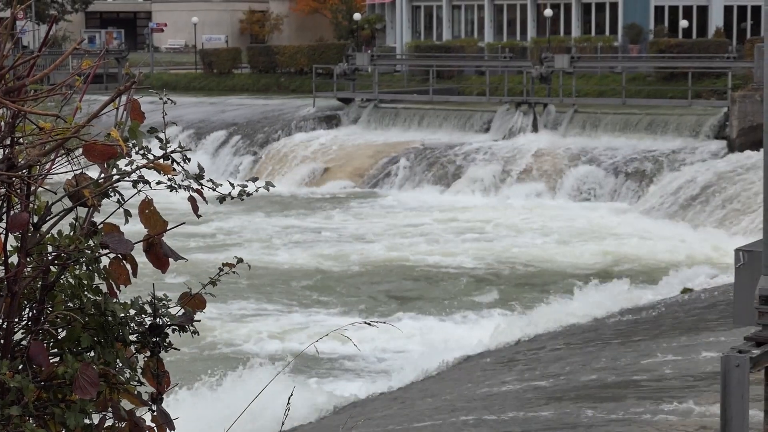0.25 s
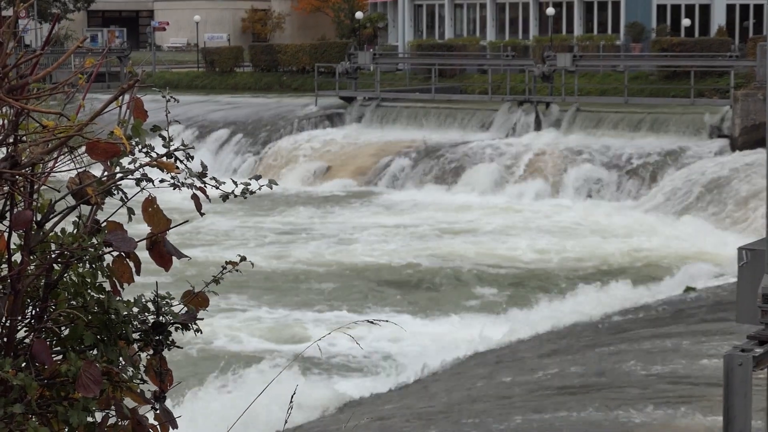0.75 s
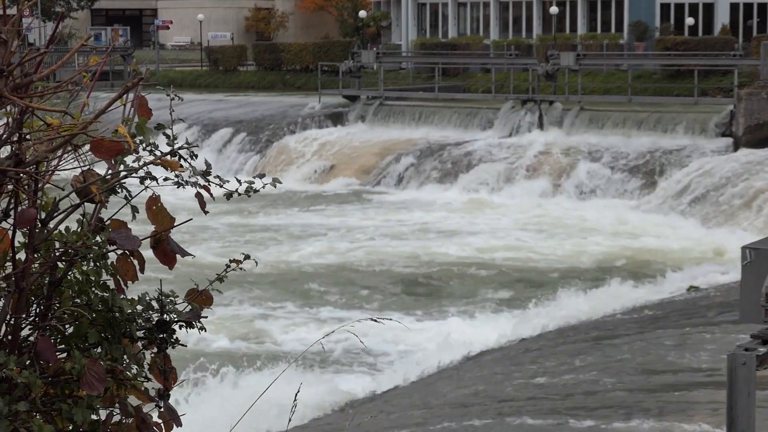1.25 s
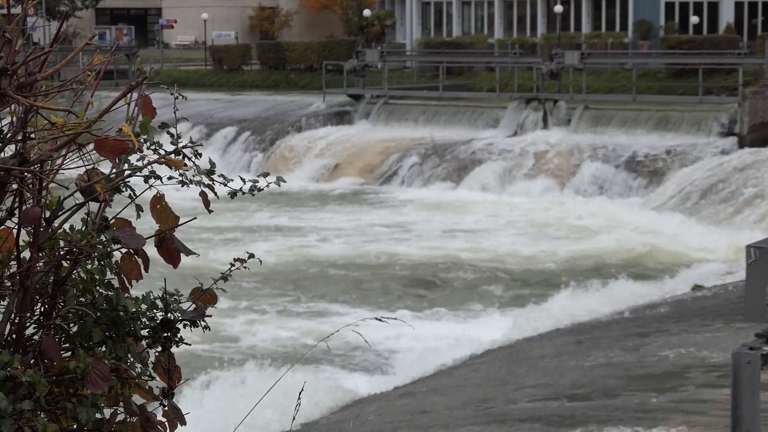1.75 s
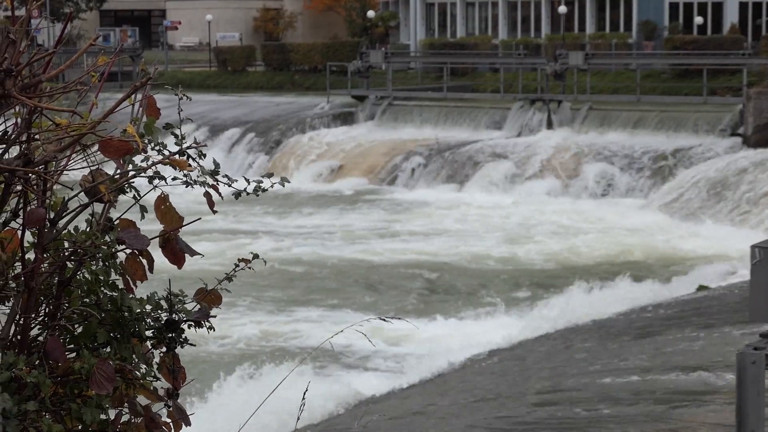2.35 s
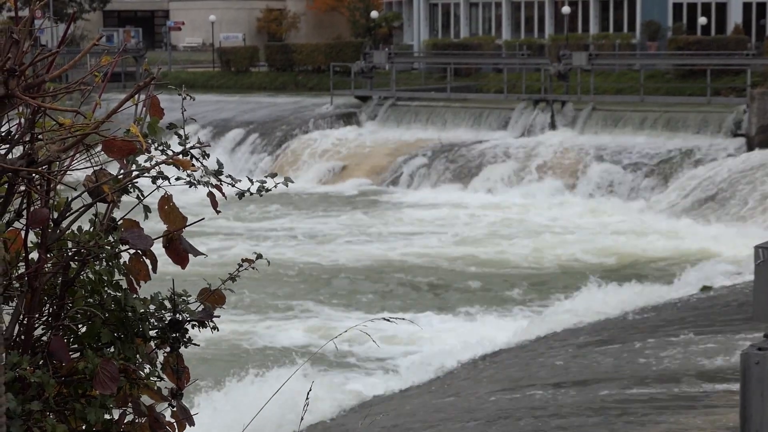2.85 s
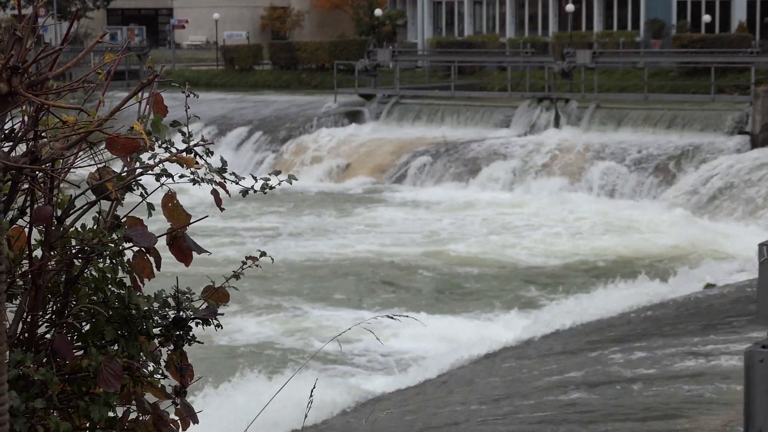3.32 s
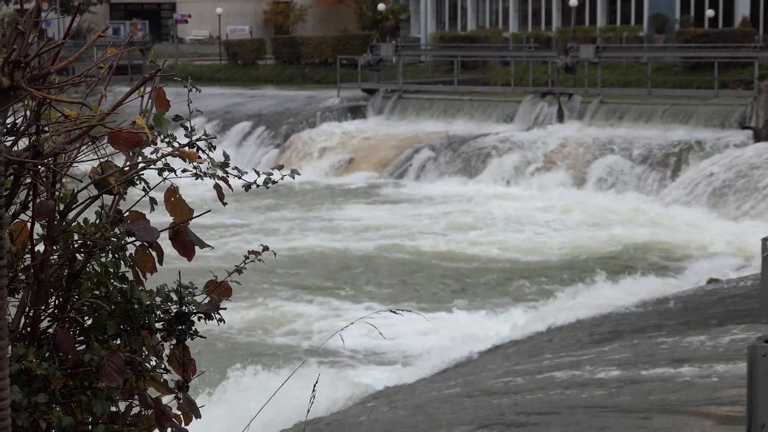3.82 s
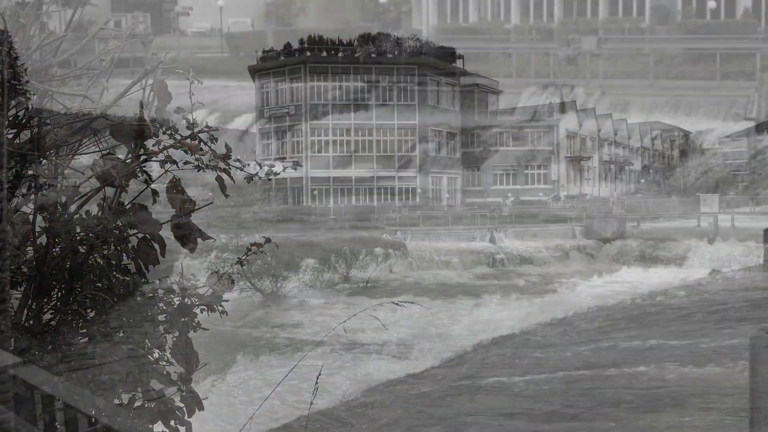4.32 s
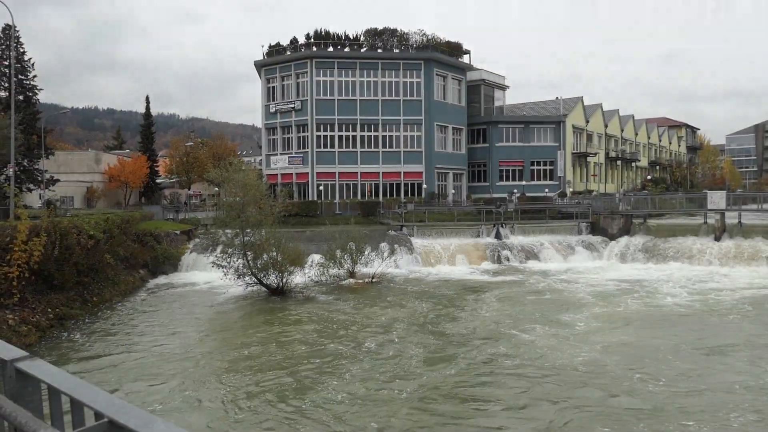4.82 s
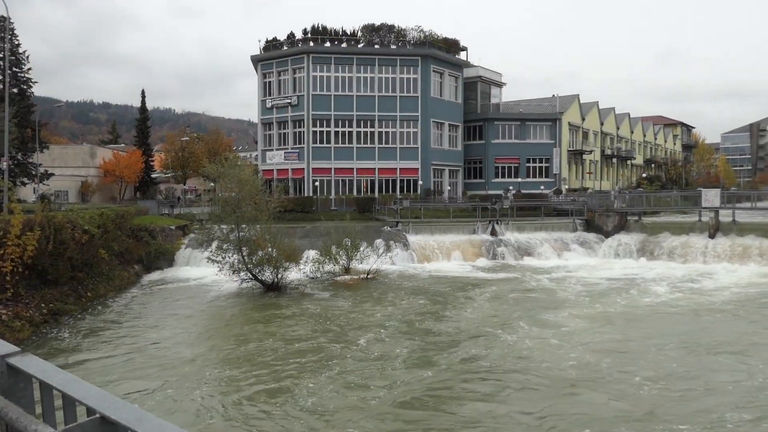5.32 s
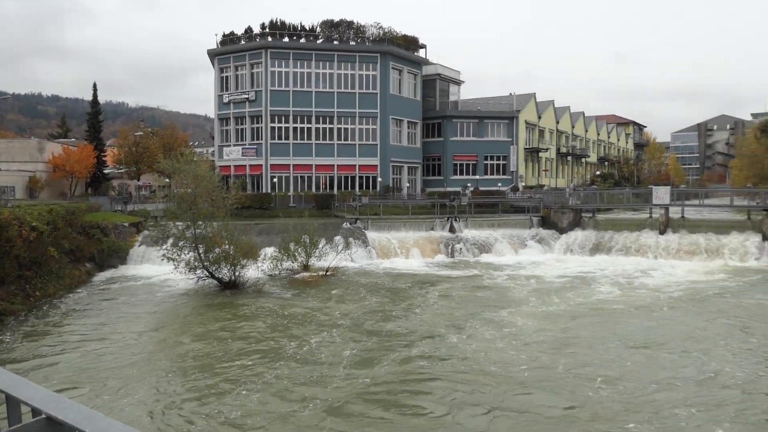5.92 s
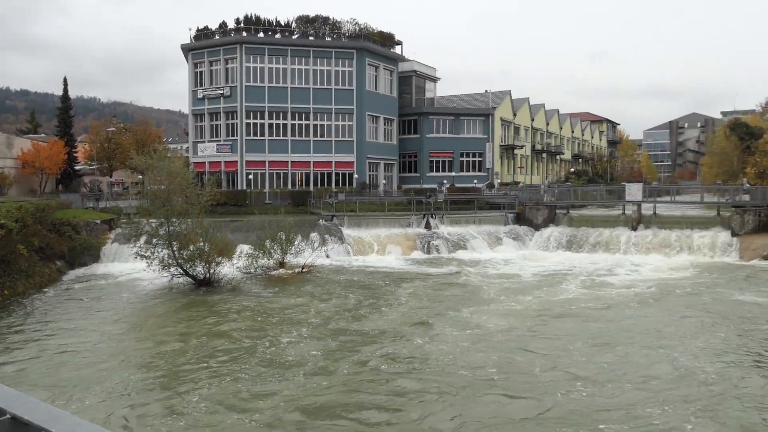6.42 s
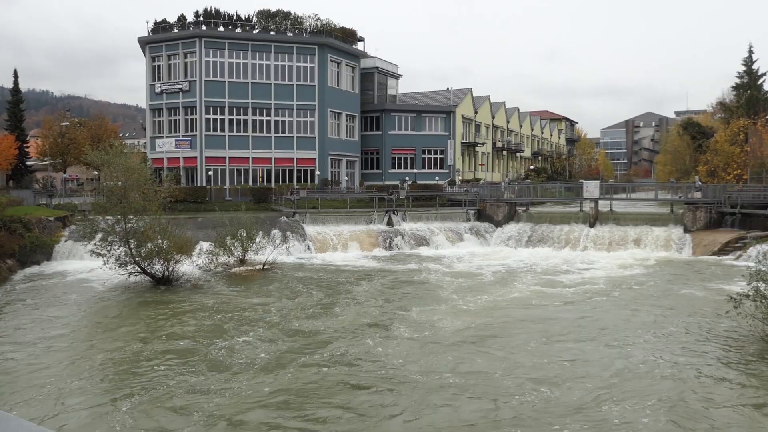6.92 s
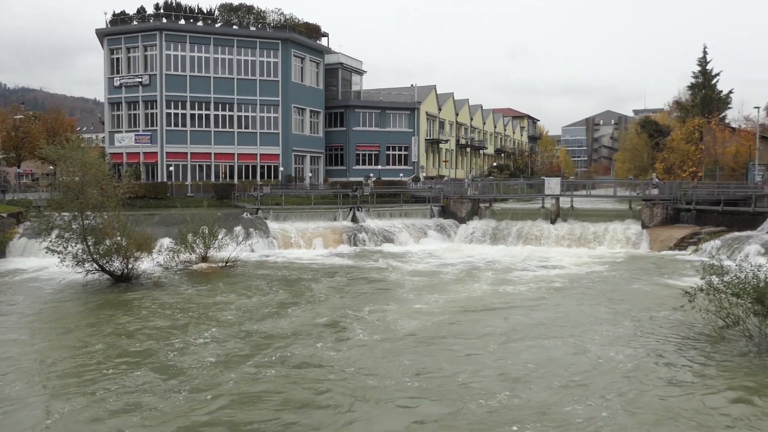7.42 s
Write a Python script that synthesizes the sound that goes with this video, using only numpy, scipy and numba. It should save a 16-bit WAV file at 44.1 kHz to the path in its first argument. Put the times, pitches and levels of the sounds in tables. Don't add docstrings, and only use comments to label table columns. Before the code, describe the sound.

From 0 to about 4.35 seconds, a swollen river churns loudly over a low weir, heard from the bank: a dense, continuous roar strongest in the low mids, with countless bubbles bursting in irregular patches and a softer, dull-topped spray. The level swells by only a decibel or so, and the image drifts slowly left. At about 4.2 seconds a very faint, thin bird whistle rises and levels off in under a tenth of a second; near 4.3 a tiny bright water tick lands close by. At 4.35 the sound cuts sharply to total silence. At about 4.64 it returns just as abruptly, the same weir from a bridge, similarly loud, with slightly more midrange wash and a different stereo spread. It surges gently, near 5.25 especially, the spray dulling slightly while drifting left, and continues until about 7.6 seconds. Compact stereo camera microphones, open air.

```python
import sys
import numpy as np
from scipy import signal
from scipy.fft import rfft, irfft, next_fast_len
from scipy.io import wavfile
from scipy.ndimage import map_coordinates
from numba import njit

SR = 44100
rng = np.random.default_rng(int(sys.argv[2]) if len(sys.argv) > 2 else 0)


def inscribe(sig):
    pcm = np.round(np.clip(np.atleast_2d(sig).T, -1, 1) * 32767)
    wavfile.write(sys.argv[1], SR, pcm.astype(np.int16))


def to_linear_factor(level_db):
    exponent = np.asarray(level_db, float) / 20
    return 10 ** exponent


N = 338247
TIME = np.arange(N) / SR
SIZE = next_fast_len(N)
HZ = np.maximum(np.arange(SIZE // 2 + 1) * SR / SIZE, 1)
BANK_END_S, BRIDGE_START_S, BRIDGE_END_S = 4.3508, 4.6441, 7.67


@njit
def ring_bubbles(start, hz, size, cycles, glide, count):
    out = np.zeros(count)
    for k in range(len(hz)):
        life = int(cycles * SR / hz[k])
        wave = size[k] + 0j
        turn = np.exp((2j * np.pi * hz[k] / SR) - 5 / life)
        climb = np.exp(2j * np.pi * hz[k] / SR * glide / life)
        for i in range(start[k], min(start[k] + life, count)):
            out[i] += wave.imag
            wave = wave * turn
            turn = turn * climb
    return out


def patches(s, octave, rate, per_octave):
    field = rng.standard_normal((100, 400))
    return map_coordinates(field, [octave * per_octave, s * rate], order=1, mode="wrap")


def unit(x):
    return x / np.sqrt(np.mean(x ** 2))


def whitewater(bubbles=260000, scatter_db=2.0, boil_db=0.9, flicker_db=2.0, roar_db=1.0):
    when, pitch, luck = rng.random((bubbles, 3)).T
    s = when * N / SR
    hz = 40 + 15500 * pitch
    octave = np.log2(hz / 40)
    burst_db = -scatter_db * np.log(1 - .995 * luck)
    boil = boil_db * patches(s, octave, 4.5, .6)
    flicker = flicker_db * patches(s, octave, 17, 2.484)
    size = np.sqrt(hz) * to_linear_factor(burst_db + boil + flicker)
    fizz = ring_bubbles((s * SR).astype(np.int64), hz, size, 10.0, .2, N)
    roar = to_linear_factor(roar_db) * rng.standard_normal(N)
    return rfft(unit(fizz) + roar, SIZE)


def over_hz(table):
    hz, *columns = np.transpose(table)
    return [np.interp(np.log(HZ), np.log(hz), c) for c in columns]


# time in seconds, level in dB.
FLOW_SURGE = [
    [(0, -0.7), (.55, -0.8), (1.1, 0.2), (1.6, -0.3), (2.2, -1.3), (2.75, -0.1), (3.3, -1.1), (3.8, .5),
     (4.35, -1)],
    [(4.64, 0.9), (4.95, -0.2), (5.25, 1.5), (5.65, -0.5), (6, 0.2), (6.3, .3), (6.65, .4), (7.1, -1.1),
     (7.67, 0.5)],
]


def viewpoint(near, wide, view, tone, ports, drift_db_per_s, spray_db_per_s, start_s, end_s):
    like, pan_db, lead = over_hz(ports)
    like = np.clip(like, 0, 1)
    left, right = to_linear_factor(pan_db / 2), to_linear_factor(-pan_db / 2)
    other_port = like * np.exp(-1j * lead) * near + np.sqrt(1 - like ** 2) * wide
    pair = np.array([left * near, right * other_port])
    pair = pair * to_linear_factor(over_hz(tone)[0]) / np.sqrt((left ** 2 + right ** 2) / 2)

    s, db = np.transpose(FLOW_SURGE[view])
    surge_db = np.interp(TIME, s, db - db.mean())
    turn_s = np.clip(TIME, start_s, end_s) - (start_s + end_s) / 2
    shares = over_hz(np.c_[(250, 1300, 6000), np.eye(3)])
    follow_db_per_db = (0.73, 0.63, 0.49)
    rumble, rush, spray = (irfft(pair * share, SIZE)[:, :N] * to_linear_factor(follow * surge_db)
                           for share, follow in zip(shares, follow_db_per_db))
    out = rumble + rush + spray * to_linear_factor(spray_db_per_s * turn_s)
    out = out * to_linear_factor(-19.5) / np.sqrt(np.mean(out.mean(axis=0) ** 2))
    out = out * to_linear_factor(drift_db_per_s * turn_s * np.array([[.5], [-.5]]))
    return out * ((TIME >= start_s - .1) & (TIME < end_s + .1))


# pitch in Hz, level in dB per Hz.
BANK_COLOUR = [(35, -38.5), (100, -10), (255, -0.5), (340, -3), (470, -9), (750, -9.5), (1400, -15),
               (2500, -17), (3600, -22), (5700, -35), (8100, -40.5), (10000, -37), (13000, -40),
               (15700, -45.5)]
# pitch in Hz, likeness 0-1, left minus right in dB, left lead in radians.
BANK_STEREO = [(30, 0.7, -10.5, 0.17), (120, 0.98, -2.5, 0), (395, .97, -1.9, 0.12),
               (900, 0.86, -2.5, 0.25), (1450, 0.79, -2, 0.54), (1780, 0.75, -.7, 0), (2500, 0.88, 0, 0.12),
               (3700, 0.91, 0, 0.43), (4500, 0.76, -0.5, 0.12), (5300, 0.2, -1, .6), (6200, 0, 2, 2.6),
               (9000, 0.2, 1, 0.75), (15000, 0.2, -3, 0.62)]


def bank_water(near, wide):
    return viewpoint(near, wide, 0, BANK_COLOUR, BANK_STEREO, drift_db_per_s=.27, spray_db_per_s=-.03,
                     start_s=0, end_s=BANK_END_S)


# pitch in Hz, level in dB per Hz.
BRIDGE_COLOUR = [(35, -34), (180, -3), (295, 0), (740, -10), (1400, -8), (1750, -10), (2120, -16),
                 (2750, -14), (4900, -26), (5800, -33), (8000, -38), (10200, -36.5), (13000, -41.5),
                 (15700, -48)]
# pitch in Hz, likeness 0-1, left minus right in dB, left lead in radians.
BRIDGE_STEREO = [(30, .5, -3, 0), (120, .98, -3, 0), (350, .97, -2, 0), (650, .92, -5, -.15),
                 (950, .88, -3.6, -.25), (1380, .78, -8.5, -1.8), (1750, .82, -.5, -1.85),
                 (2080, .6, 5.2, -.4), (2450, .88, 2.8, -.05), (3300, .85, .3, .1), (4300, .76, 1, .1),
                 (5250, .15, 0, 0), (6700, .45, .5, 3), (12000, .35, -1, 0)]


def bridge_water(near, wide):
    return viewpoint(near, wide, 1, BRIDGE_COLOUR, BRIDGE_STEREO, drift_db_per_s=.35, spray_db_per_s=-.1,
                     start_s=BRIDGE_START_S, end_s=BRIDGE_END_S)


def bird(start_s=4.215, length_s=.08, level_db=-48.5, low_hz=5550, high_hz=6530, climb_s=.018, edge_s=.009):
    s = np.clip(TIME - start_s, 0, length_s)
    hz = high_hz - (high_hz - low_hz) * np.exp(-s / climb_s)
    swell = np.clip(np.minimum(s, length_s - s) / edge_s, 0, 1)
    return np.sqrt(2) * to_linear_factor(level_db) * swell * np.sin(2 * np.pi * np.cumsum(hz) / SR)


# time in seconds, peak in dB.
STRAY_DROPS = [
    (4.297, -25),
]


def drops():
    out = np.zeros(N)
    for s, db in STRAY_DROPS:
        out += to_linear_factor(db) * np.exp(-np.abs(TIME - s) / 0.0013) * rng.standard_normal(N)
    return signal.sosfilt(signal.butter(2, (4000, 10000), "band", fs=SR, output="sos"), out)


# start in seconds, lowest joined pitch in Hz,
# share of patches upside down at 7 kHz, the same share at 13 kHz.
JOINED_TREBLE = [
    (0, 6200, .09, .02),
    (2.2, 6200, .15, .14),
    (4.5, 17000, 0, 0),
    (4.9, 8500, .2, .12),
    (5, 6200, .25, .055),
]


def share_treble(x, step_db=2.0, wander_db=1.5, top_lost=.45, coarse=1.7):
    frame, frame_start, top_line = 1024, 620, 704
    band_edges = np.r_[292, 320:769:32]
    n, k = np.arange(2 * frame)[:, None] + .5, np.arange(frame) + .5
    window = np.sin(np.pi * n / frame / 2)
    basis = window * np.cos(np.pi / frame * (n + frame / 2) * k) * np.sqrt(2 / frame)
    lead = 2 * frame - frame_start
    blocks = np.pad(x, ((0, 0), (lead, 2 * frame - (N + lead) % frame))).reshape(2, -1, frame)
    left, right = np.concatenate([blocks[:, :-1], blocks[:, 1:]], axis=2) @ basis
    count = len(left)

    s, *columns = np.transpose(JOINED_TREBLE)
    frame_s = ((np.arange(count) + 1) * frame - lead) / SR
    stretch = np.maximum(np.searchsorted(s, frame_s) - 1, 0)
    from_hz, low, high = (c[stretch] for c in columns)
    for a, b in zip(band_edges[:-1], band_edges[1:]):
        hz = a * SR / frame / 2
        chance = low + (high - low) * np.clip((hz - 7000) / 6000, 0, 1)
        luck = rng.random(count)
        luck = np.where(rng.random(count) < .08, np.roll(luck, 1), luck)
        sign = np.where(luck < chance, -1, 1)[:, None]
        both = left[:, a:b] + sign * right[:, a:b]
        left_power, right_power, both_power = (np.sum(v ** 2, axis=1, keepdims=True) + 1e-18
                                               for v in (left[:, a:b], right[:, a:b], both))
        pan_db = 10 * np.log10(right_power / left_power) + wander_db * rng.standard_normal(sign.shape)
        pan_db = step_db * np.round(pan_db / step_db)
        step = coarse * (hz / 10000) ** 0.37 * np.sqrt(both_power / (b - a))
        both = np.round(both / step)
        both = both * np.sqrt(left_power / (np.sum(both ** 2, axis=1, keepdims=True) + 1))
        on = hz >= from_hz
        left[on, a:b] = both[on]
        right[on, a:b] = (sign * to_linear_factor(pan_db) * both)[on]
    lost = rng.random(count) < top_lost
    left[lost, top_line:] = 0
    right[lost, top_line:] = 0
    halves = np.array([left, right]) @ basis.T
    out = halves[:, 1:, :frame] + halves[:, :-1, frame:]
    return out.reshape(2, -1)[:, lead - frame:lead - frame + N]


def scene():
    near, wide = whitewater(), whitewater()
    return bank_water(near, wide) + bridge_water(near, wide) + bird() + drops()


def band_limit(x):
    return signal.sosfilt(signal.butter(12, 15660, fs=SR, output="sos"), x)


def record(dry):
    notch_hz, notch_width_hz, notch_leak = 3011, 396, 0.065
    band = signal.sosfilt(signal.butter(2, 45, "high", fs=SR, output="sos"), dry)
    band = signal.sosfilt(signal.cheby1(8, .5, 15060, fs=SR, output="sos"), band)
    notched = signal.lfilter(*signal.iirnotch(notch_hz, notch_hz / notch_width_hz, SR), band)
    joined = share_treble(notched + notch_leak * (band - notched))
    outside_s = np.maximum(BANK_END_S - TIME, TIME - BRIDGE_START_S)
    gate = np.sin(np.pi / 2 * np.clip(outside_s / .0008, 0, 1)) ** 2
    return band_limit(joined * gate)


dry = scene()
out = record(dry)
inscribe(out)
```